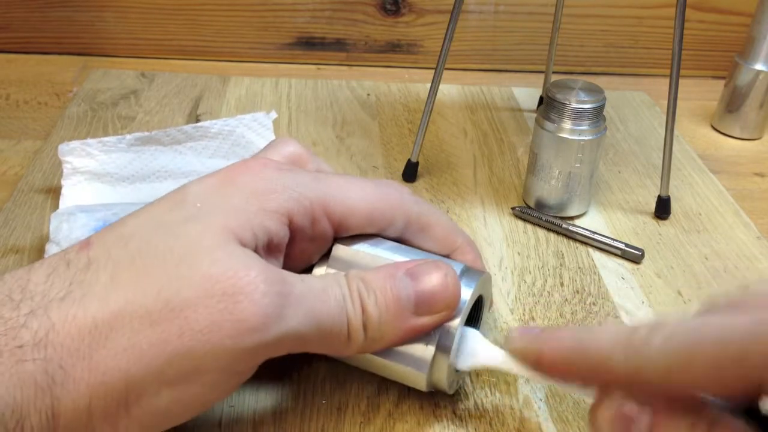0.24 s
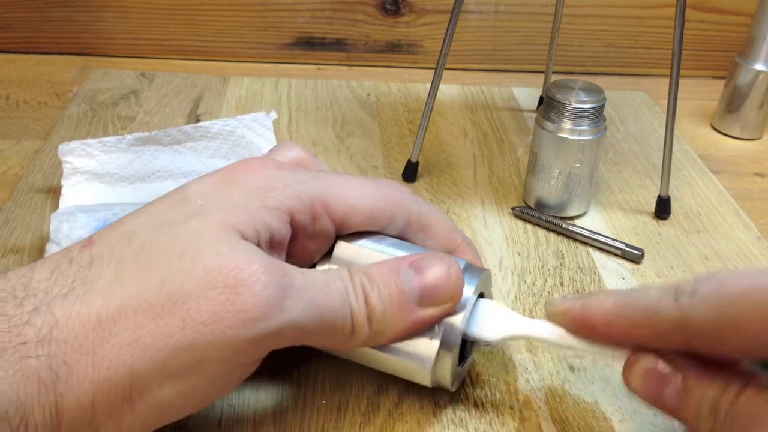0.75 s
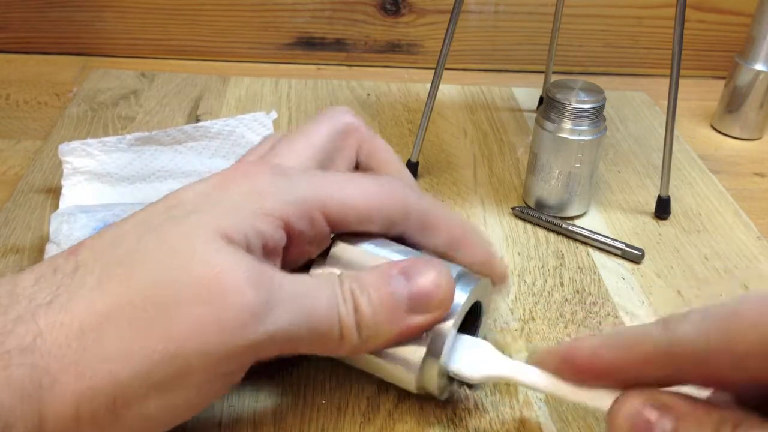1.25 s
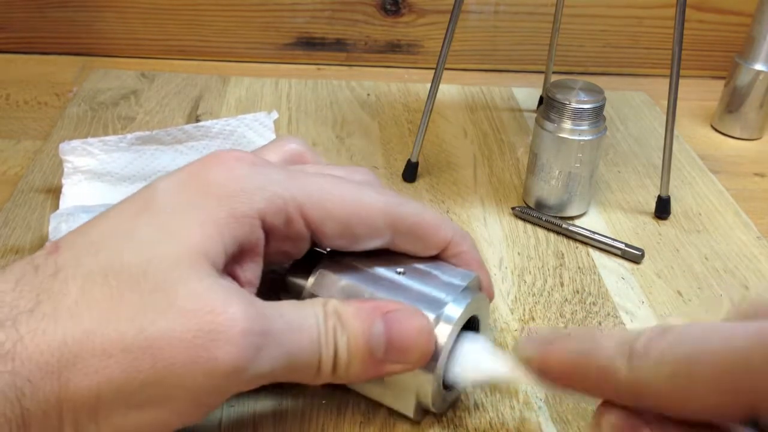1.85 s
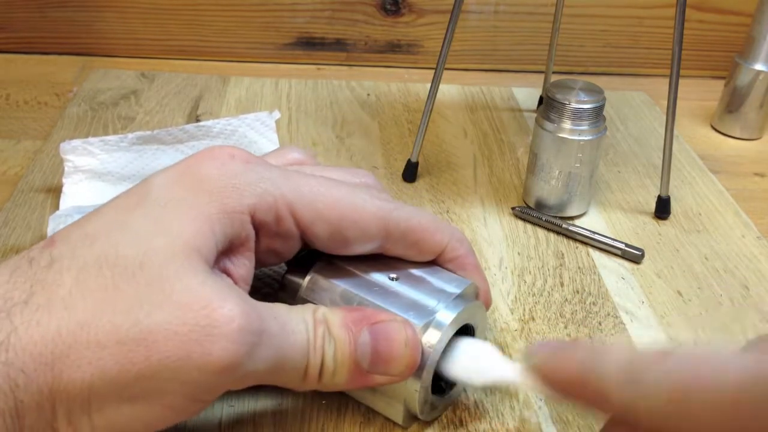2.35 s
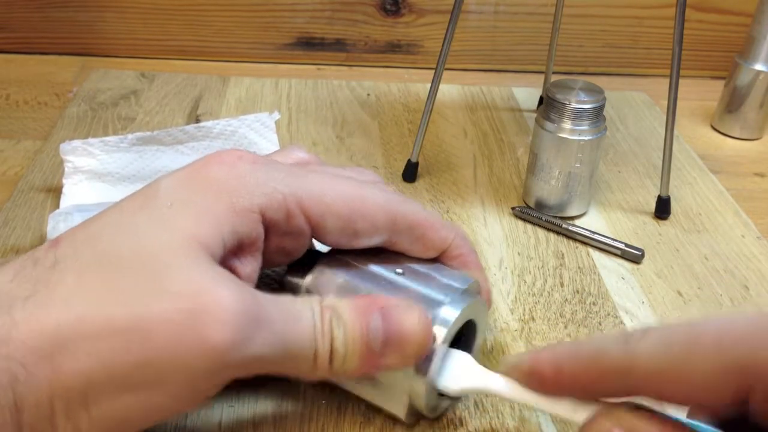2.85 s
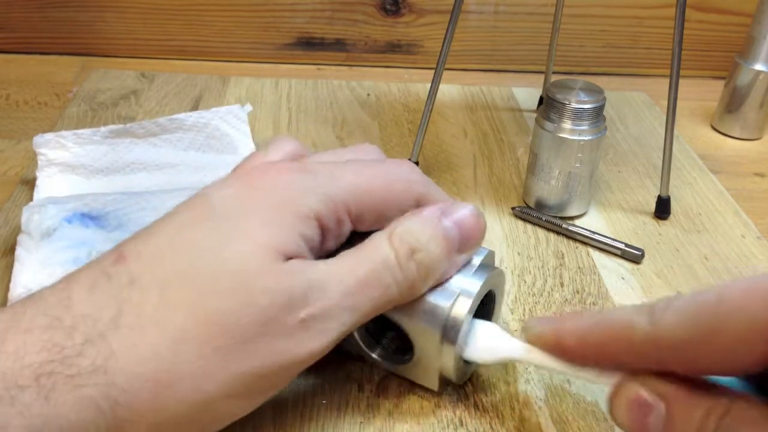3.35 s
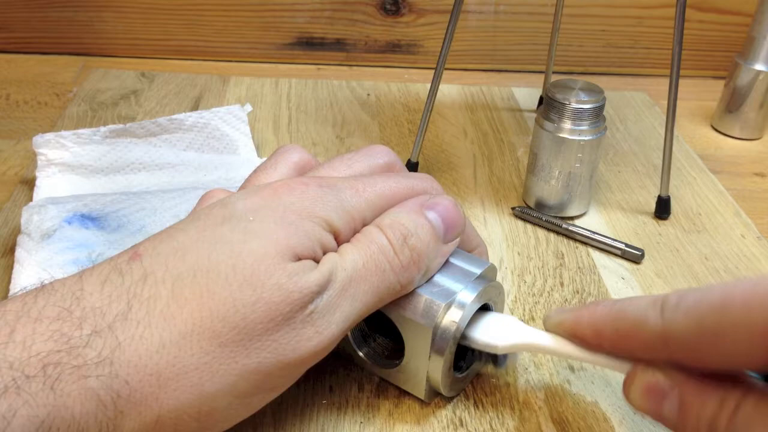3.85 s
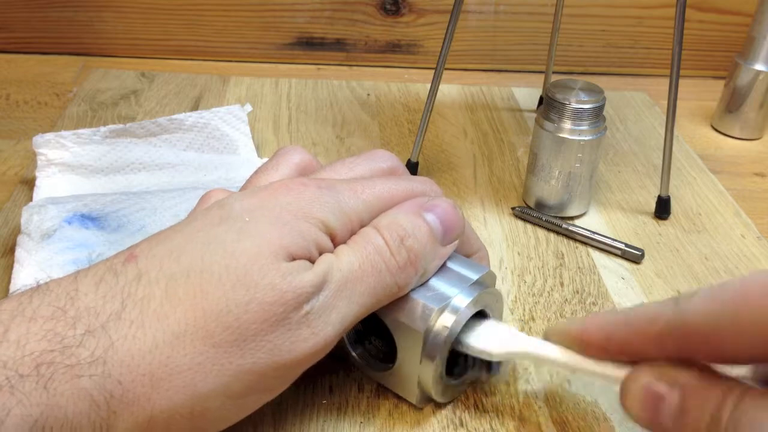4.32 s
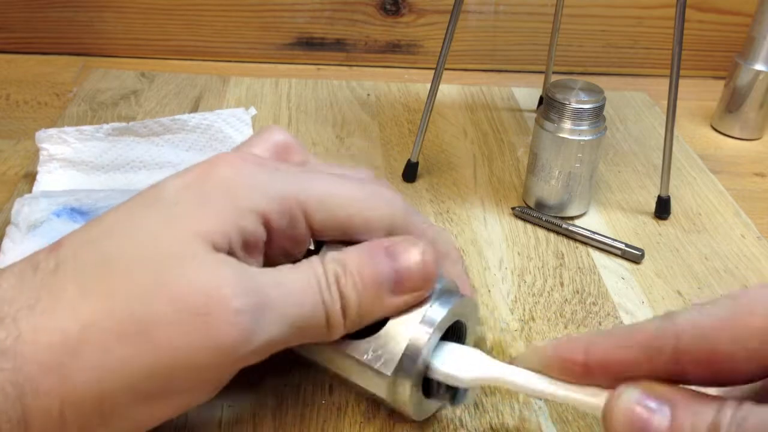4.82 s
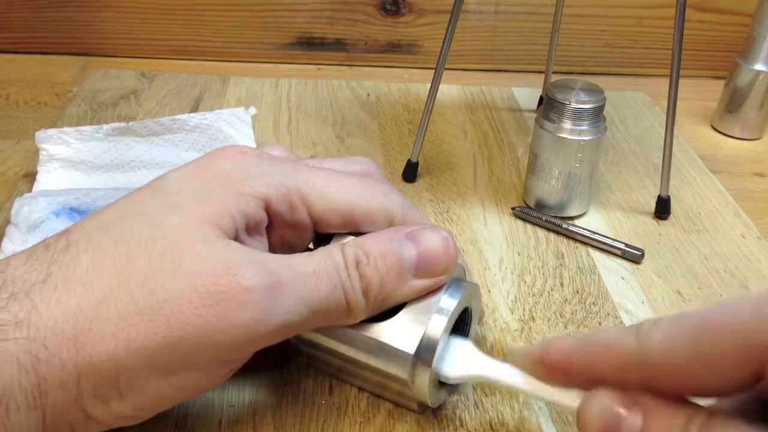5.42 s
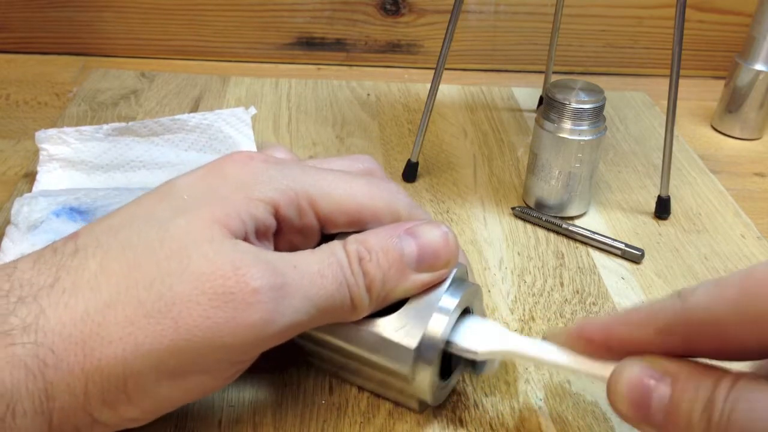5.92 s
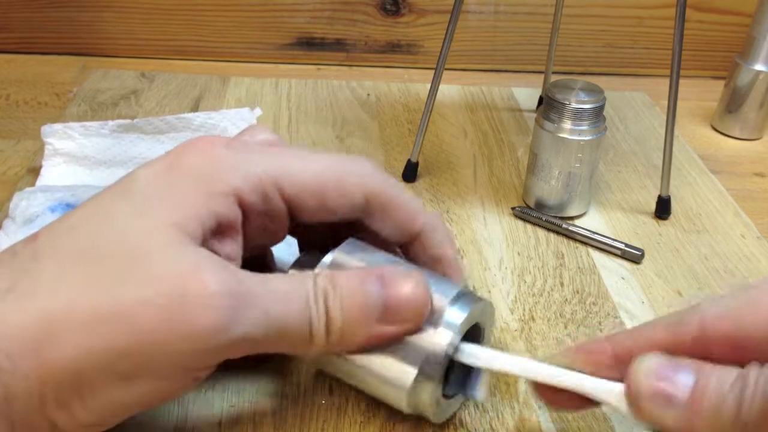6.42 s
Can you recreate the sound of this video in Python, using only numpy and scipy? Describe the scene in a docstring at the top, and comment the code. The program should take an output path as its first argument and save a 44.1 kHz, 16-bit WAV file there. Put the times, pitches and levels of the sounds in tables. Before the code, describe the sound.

Close microphone in a small, quiet room: a wet toothbrush scrubs the threads inside a hollow metal part in fast, uneven strokes, fizzy and hollow, with bright bristle snaps and little taps. Turning the part scrapes the wood and lands a hard clack near the start; softer knocks come midway, and another hard double clack late, after which brushing nearly stops.

```python
"""A small room, close microphone: a hollow metal part is held on a wooden workbench and brushed wet.
Toothbrush bristles flick over its inside threads as random tiny impacts that sound the bore; tufts snap free
as bright sprays of noise, and the brush head taps the bore. Turning the part stutters over the wood grain;
it knocks on the bench, twice tipping down hard, as noise bursts with a damped ring. Soft shoves sound dull.
The room answers with decaying noise, over faint air."""
import sys
import numpy as np
from scipy import signal
from scipy.fft import rfft, irfft, next_fast_len
from scipy.io import wavfile
from scipy.ndimage import uniform_filter1d, map_coordinates

SR = 44100
rng = np.random.default_rng(int(sys.argv[2]) if len(sys.argv) > 2 else 0)


def to_wav(s):
    """Save 16-bit WAV."""
    ch = np.atleast_2d(s).T  # columns
    pcm = np.round(np.clip(ch, -1, 1) * 32767)  # PCM
    wavfile.write(sys.argv[1], SR, pcm.astype(np.int16))


N = 294147  # length [samples]


def amp(db):
    """Decibels to gain."""
    return 10 ** (np.asarray(db) / 20)


def unit(x):
    """Scale to rms 1."""
    return x / np.sqrt(np.mean(x ** 2) + 1e-20)


def seconds(length):
    """Time axis [s] for a sound of the given number of samples."""
    return np.arange(length) / SR


def along(points, hz):
    """Read (frequency, value) points on a log frequency axis."""
    f, value = np.transpose(points)
    return np.interp(np.log(hz + 1), np.log(f + 1), value)


def wobble(rate):
    """A smooth random curve, rate knots a second."""
    knots = rng.standard_normal(int(N * rate / SR) + 4)
    return map_coordinates(knots, [np.arange(N) * rate / SR])


def filtered(x, response):
    """Multiply the spectrum of x by a response of frequency [Hz]."""
    size = next_fast_len(len(x) + SR // 4)
    hz = np.fft.rfftfreq(size, 1 / SR)
    return irfft(rfft(x, size) * response(hz), size)[:len(x)]


def coloured(x, spectrum, size=4096):
    """Causal (minimum-phase) filter of unit energy with the given spectrum."""
    gain = amp(along(spectrum, np.fft.rfftfreq(size, 1 / SR)))
    cepstrum = irfft(np.log(gain + 1e-6))
    # folding the cepstrum onto positive times makes the filter causal
    cepstrum[1:size // 2] *= 2
    cepstrum[size // 2 + 1:] = 0
    kernel = irfft(np.exp(rfft(cepstrum)))
    return signal.fftconvolve(x, kernel / np.linalg.norm(kernel))[:len(x)]


def grains(rate, spread_db):
    """Random tiny impacts of uneven size, about rate a second, rms 1."""
    size = amp(spread_db * np.clip(rng.standard_normal(N), -2, 2))
    hits = rng.random(N) < rate / SR
    return unit(hits * size * np.sign(rng.standard_normal(N)))


def burst(t, t60):
    """Noise that dies away by 60 dB in t60 [s], with the same energy at every blow."""
    fade = amp(-60 * t / t60)
    noise = fade * rng.standard_normal(len(t))
    return noise * np.linalg.norm(fade) / np.linalg.norm(noise)


def add(track, s, sound):
    """Mix a sound into the track at time s [s]."""
    start = max(round(s * SR), 0)
    track[start:start + len(sound)] += sound[:N - start]


RISE_SHARE = 0.39  # part of a movement spent speeding up
END_DROP_DB, ROUNDNESS = 22, 1.48  # fall from the peak to either end [dB]; power of that fall


def swells(times, lengths, levels_db):
    """Gain of hand movements: each speeds up, peaks and slows down, and its friction noise follows."""
    t, power = seconds(N), np.zeros(N)
    for s, length, db in zip(times, lengths, levels_db):
        near = slice(*np.searchsorted(t, [s - 2 * length, s + 2 * length]))
        phase = (t[near] - s) / length
        away = np.maximum(-phase / RISE_SHARE, phase / (1 - RISE_SHARE))
        power[near] += amp(db - END_DROP_DB * away ** ROUNDNESS) ** 2
    return np.sqrt(power)


def shifting(x, depth_db):
    """The colour drifts as the brush head opens and closes the mouth of the bore."""
    z = signal.stft(x, nperseg=512)[2]
    field = uniform_filter1d(rng.standard_normal(z.shape), size=6, axis=0)  # smooth over frequency
    field = uniform_filter1d(field, size=14, axis=1)  # smooth over time
    return signal.istft(z * amp(depth_db * unit(field)), nperseg=512)[1][:N]


# colour of the faint room air: (frequency [Hz], relative level per Hz [dB])
AIR_SPECTRUM = [(15, -76.5), (25, -44), (82, -40), (189, 3), (342, -3), (557, -18.5), (881, 6), (1040, -13),
                (1360, -17), (2810, -24.5), (7420, -8.5), (14600, -22.5), (15800, -32.5)]


def room_air():
    """Steady noise of the air in the room."""
    return amp(-79.5) * coloured(rng.standard_normal(N), AIR_SPECTRUM)


# broad resonances of the hollow part: (frequency [Hz], width [Hz], relative level [dB])
BORE_MODES = [(890.7, 45, 3.5), (1167, 130, -3), (1396, 170, -0.5), (1760, 170, 0.5), (1911, 320, -5),
              (2254, 110, -2.5), (3130, 630, -16.5)]


def bore(x, spread_db):
    """The hollow part resonates; the mode strengths depend on where the brush touches."""
    touch = spread_db * rng.standard_normal(len(BORE_MODES))

    def response(f):
        total = 0
        for k, (centre, width, db) in enumerate(BORE_MODES):
            damping = 1j * f * width
            resonance = damping / (centre * centre - f * f + damping)
            total = total + (-1) ** k * amp(db + touch[k]) * resonance  # signs alternate
        return total

    return filtered(x, response)


# pushes, pulls and twists of the brush in the threads:
# (time of fastest point [s], hiss length [s], relative hiss level [dB], relative bore level [dB])
STROKES = [(0.031, 0.27, -55, -55.5), (0.096, 0.055, -52, -56.5), (0.185, 0.172, -52, -52.5),
           (0.326, 0.15, -40.5, -46.5), (0.402, 0.06, -49.5, -58), (0.474, 0.12, -41.5, -40.5),
           (0.57, 0.061, -48, -66), (0.6, 0.16, -56.5, -53), (0.737, 0.087, -48, -52),
           (0.784, 0.09, -62.5, -62.5), (0.899, 0.11, -53.5, -45), (0.976, 0.067, -43.5, -44.5),
           (1.028, 0.14, -51.5, -55), (1.124, 0.1, -50.5, -45.5), (1.2, 0.082, -45.5, -55),
           (1.285, 0.124, -46, -49), (1.37, 0.19, -59, -67.5), (1.49, 0.16, -68, -57.5),
           (1.787, 0.085, -42, -43.5), (1.861, 0.139, -57.5, -59.5), (1.946, 0.2, -46.0, -54),
           (2.073, 0.074, -46.5, -51.5), (2.126, 0.24, -64, -59), (2.235, 0.137, -40.5, -47.5),
           (2.347, 0.108, -44.0, -51), (2.395, 0.2, -54, -57), (2.483, 0.1, -46.5, -38.5),
           (2.546, 0.25, -48.5, -52.5), (2.698, 0.211, -47, -49.5), (2.815, 0.076, -46.5, -46.5),
           (2.917, 0.193, -52, -56.5), (3.433, 0.14, -46, -48), (3.485, 0.052, -70, -68.5),
           (3.607, 0.22, -56, -54.0), (3.697, 0.08, -52, -59), (3.784, 0.05, -45, -56),
           (3.831, 0.1, -61.5, -55.5), (3.908, 0.16, -61.0, -51.5), (3.982, 0.17, -54, -63),
           (4.165, 0.13, -41.5, -48), (4.242, 0.085, -60, -48), (4.337, 0.108, -54, -50.5),
           (4.42, 0.17, -51, -55.0), (4.533, 0.201, -56.5, -58.5), (4.633, 0.063, -48, -59.5),
           (4.667, 0.14, -50, -65), (4.765, 0.096, -57, -56.5), (4.866, 0.093, -51, -57),
           (4.935, 0.195, -47.0, -57), (5.139, 0.146, -44.5, -50.5), (5.245, 0.082, -50.0, -56.5),
           (5.329, 0.28, -57, -62.5), (5.457, 0.14, -52.5, -66.5), (5.51, 0.12, -72, -61),
           (5.561, 0.1, -60.5, -65), (5.618, 0.071, -47, -49.5), (5.68, 0.156, -59, -50.5),
           (5.73, 0.11, -59.5, -66), (5.817, 0.15, -47.5, -58.5), (5.965, 0.067, -49, -57),
           (6.068, 0.24, -52, -52.5), (6.605, 0.16, -73.5, -67), (6.667, 0.076, -60, -69.5)]
# colour of wet bristles, also in snaps and taps: (frequency [Hz], relative level per Hz [dB])
BRISTLE_SPECTRUM = [(500, -38), (1500, -9), (2800, -10), (4200, -5), (5600, -6), (6500, -0.5), (7300, 2.5),
                    (8000, 1.5), (8900, 3), (10200, -3), (11500, -1.5), (13000, -1.5), (14800, -1),
                    (15800, -14.5)]
# dull colour of the bench shaken by hand or brush: (frequency [Hz], relative level per Hz [dB])
HANDLING_SPECTRUM = [(40, -39.5), (90, -34), (150, -3), (220, -3), (300, 0), (345, 5), (430, -13.5),
                     (560, -13.5), (700, -10.5), (900, -27), (1400, -37.5)]
BORE_LAG_S = 0.0033  # the bore sounds just after the bristle tips catch
REST_DB = -78  # bristles creeping in the threads between strokes, on the scale of the hiss levels


def scrubbing():
    """Bristles flick over the thread crests, sound the bore and shake the bench through the part."""
    s, length, hiss_db, bore_db = np.transpose(STROKES)
    hiss = np.hypot(swells(s, length, hiss_db), amp(REST_DB))
    hollow = swells(s + BORE_LAG_S, 0.86 * length, bore_db)
    catch = amp(1.9 * wobble(80))  # tufts catch and let go together
    flicks = coloured(grains(rate=5500, spread_db=6.0), BRISTLE_SPECTRUM)
    fizz = unit(shifting(flicks, depth_db=3.0))
    rub = unit(shifting(bore(grains(rate=2800, spread_db=1.5), spread_db=1.0), depth_db=2.5))
    rumble = unit(coloured(grains(rate=720, spread_db=3), HANDLING_SPECTRUM)) * amp(3.6 * wobble(20))
    push = unit(hollow ** 0.63)  # the load on the bench grows with the force of the stroke
    brushing = catch * (amp(0.18) * hiss * fizz + amp(-1.67) * hollow * rub)
    return brushing + amp(-62.5) * push * rumble


# decay of the small room: (frequency [Hz], time to fall 60 dB [s])
ROOM_DECAY = [(150, 0.27), (400, .36), (1000, 0.28), (2500, 0.28), (5000, 0.18), (12000, 0.046)]


def room(x):
    """Bench top and near walls answer within milliseconds; the treble dies first."""
    hz, t, z = signal.stft(rng.standard_normal(SR // 2), SR, nperseg=256)
    decay = amp(-60 * t / along(ROOM_DECAY, hz)[:, None])
    tail = signal.istft(z * decay, SR, nperseg=256)[1]
    tail *= 1 - np.exp(-seconds(len(tail)) / 0.0012)  # the answer builds up
    return signal.fftconvolve(x, tail / np.linalg.norm(tail))[:N]


# the hands press the part against the bench: (time [s], relative level [dB])
BUMPS = [(0.099, -49.5), (0.59, -53), (1.484, -47), (2.776, -50.5), (3.464, -49), (3.59, -45),
         (3.712, -49.5), (4.241, -53), (5.663, -51.5), (5.824, -55)]


def bumps():
    """Soft, dull shoves into the bench top: low noise with a gradual onset."""
    out, t = np.zeros(N), seconds(SR // 4)
    for s, db in BUMPS:
        shove = burst(t, t60=0.24) * (1 - np.exp(-t / 0.0081))
        add(out, s, amp(db + 2.0) * coloured(shove, HANDLING_SPECTRUM))
    return out


# wet bristle tufts snap free: (time [s], relative level [dB])
SNAPS = [(0.2713, -36), (0.3444, -26.5), (0.4946, -19.5), (0.545, -31.5), (0.7275, -31), (0.9649, -34),
         (1.1868, -24), (1.3078, -25), (1.3296, -20), (2.2539, -25.5), (2.3384, -28), (2.5137, -23),
         (2.5741, -21.5), (2.8066, -23.5), (3.4281, -14.5), (3.4347, -18), (4.1572, -23.5), (5.244, -30.5),
         (5.6169, -29), (6.1384, -39.5)]
SNAP_LOW_HZ = 5540  # a snapping tuft is too small to radiate much below this


def snaps():
    """A tuft snaps off a thread: one short, bright spray."""
    out, t = np.zeros(N), seconds(SR // 16)
    for s, db in SNAPS:
        spray = burst(t, t60=0.0095) * (1 - np.exp(-t / 0.00051))
        add(out, s, amp(db - 1.5) * coloured(spray, BRISTLE_SPECTRUM))
    highpass = signal.butter(2, SNAP_LOW_HZ, "highpass", fs=SR, output="sos")
    return signal.sosfilt(highpass, out)


# the brush head hits the bore:
# (time [s], relative bore level [dB], relative click level [dB], relative bristle flick level [dB])
TAPS = [(0.302, -22, -34.5, -35), (0.485, -17, -33, -33.5), (0.878, -15, -37.5, -34),
        (1.114, -20, -36, -33), (1.281, -17.5, -31, -37.5), (1.9445, -32.5, -35.5, -45.5),
        (2.206, -20, -34, -34), (2.345, -27, -48.5, -39.5), (2.466, -12.5, -19.5, -29.5),
        (2.682, -19.5, -21.5, -31.5), (2.908, -25.5, -27, -33.5), (3.347, -25.5, -20, -40.5),
        (3.8054, -25.5, -62, -64), (4.163, -27, -36, -37.5), (4.339, -20.5, -31, -44),
        (5.128, -18.5, -28.5, -36.5), (5.671, -35, -55, -63), (5.841, -31.5, -69, -59),
        (6.081, -18.5, -30.5, -54)]
# colour of the plastic head on metal: (frequency [Hz], relative level per Hz [dB])
CLICK_SPECTRUM = [(60, -39), (150, -3.5), (290, -0.5), (550, -7), (1500, -8), (2500, 2), (3400, 6.5),
                  (4400, 5.5), (6000, 3.5), (9000, -11), (15000, -22.5)]
TAP_SHAKE_DB = -34  # shake of the bench under a tap, added to the listed bore level


def taps():
    """The plastic head grazes the metal, clicks, the bore answers, the bench shakes; the bristles spring past."""
    out, t = np.zeros(N), seconds(SR // 8)
    lead = 0.03  # the graze and flick swell for this long before the hit [s]
    flick = np.where(t < lead, np.exp((t - lead) / 0.0063), np.exp((lead - t) / 0.0017))
    for s, db, click_db, flick_db in TAPS:
        blow = signal.unit_impulse(len(t))
        chatter = burst(t, t60=0.028)
        ring = bore(blow + 0.11 * chatter, spread_db=0.5)
        graze = unit(bore(rng.standard_normal(len(t)), spread_db=5.0))
        spray = coloured(rng.standard_normal(len(t)), BRISTLE_SPECTRUM)
        shake = coloured(burst(t, t60=0.16), HANDLING_SPECTRUM)
        click = coloured(6 * blow + burst(t, t60=0.012), CLICK_SPECTRUM)
        add(out, s, amp(db - 1.0) * ring / np.abs(ring).max())
        add(out, s, amp(db + TAP_SHAKE_DB) * shake)
        add(out, s, amp(click_db - 0.5) * click)
        add(out, s - lead, flick * (amp(flick_db + 3.0) * spray + amp(db - 20.5) * graze))
    return out


# the part is dragged over the wood as it is turned:
# (time of fastest point [s], length [s], relative grating level [dB], relative edge level [dB])
DRAGS = [(1.603, 0.12, -34, -41.5), (2.933, 0.093, -30, -37), (4.747, .14, -27.5, -35),
         (4.814, 0.071, -35, -68), (4.933, .14, -40.5, -69), (6.163, 0.023, -39, -26),
         (6.387, 0.12, -38.5, -50.5)]
# colour of metal grating on wood grain: (frequency [Hz], relative level per Hz [dB])
GRATING_SPECTRUM = [(60, -37.5), (130, -23), (255, -4.5), (360, -8.5), (470, -5.5), (600, 0.5),
                    (730, -11.5), (870, 5), (1050, -12), (1330, -6), (1800, -13.5), (2230, -10.5),
                    (2800, -26.5), (7000, -51)]
# colour of a metal edge on wood, also in knocks: (frequency [Hz], relative level per Hz [dB])
EDGE_SPECTRUM = [(300, -46.5), (1200, -27.5), (2000, -3.5), (2600, 4.5), (3400, 6.5), (3900, 1.5),
                 (4500, -4.5), (6000, -13.5), (9000, -26), (15000, -46.5)]


def drags():
    """The turned part stutters over the wood grain in tiny slips."""
    s, length, grating_db, edge_db = np.transpose(DRAGS)
    grating, edge = swells(s, length, grating_db), swells(s, length, edge_db)
    slips = grains(rate=1800, spread_db=4) * amp(2.2 * wobble(150))
    flat_scrape = grating * unit(coloured(slips, GRATING_SPECTRUM))
    edge_scrape = edge * unit(coloured(slips, EDGE_SPECTRUM))
    return amp(-1.4) * flat_scrape + amp(-4.5) * edge_scrape


# the part drops or rebounds on the bench: (time [s], relative clack level [dB],
# relative thud level [dB], relative edge level [dB], lowpass corner of the contact [Hz])
KNOCKS = [(1.632, -1.5, -23.5, -13, 9960), (2.921, -22, -51, -43, 1764), (4.801, -14.5, -30, -45, 1570),
          (6.169, -2, -16.5, -1.5, 10200), (6.186, -16, -34.5, -20, 10040), (6.388, -21, -26.5, -48, 880)]
# colour of the clack on the bench: (frequency [Hz], relative level per Hz [dB])
BENCH_SPECTRUM = [(40, -41.5), (200, -7.5), (330, -6), (550, -9.5), (930, -1), (1400, -6), (1770, 1.5),
                  (2250, 1.5), (2700, -10.5), (3350, -2.5), (4300, -16), (7300, -34), (8300, -31.5),
                  (15000, -60)]
# colour of the bench's thud: (frequency [Hz], relative level per Hz [dB])
THUD_SPECTRUM = [(25, -37), (90, -26), (160, -14), (240, 0.5), (345, 18), (480, 0), (900, -52.5)]
# part and bench ringing together: (frequency [Hz], relative level [dB], time to fall 60 dB [s])
RING_MODES = [(236, -3.5, .19), (268, -4, .22), (352, -1.5, .2), (737, -3.5, .14), (900, -7, 0.2),
              (971, -3.5, 0.34), (1236, -5, .22), (1490, -5, .14), (1890, -2.5, .22), (2055, 0.5, .22),
              (2207, -1.5, .14), (2365, -2.5, 0.19), (2738, -6, .22), (3143, -5, 0.12), (3350, -2, 0.26),
              (3660, -9, .36), (8200, -20, .2)]


def knocks():
    """The part falls on a flat and chatters to rest: hard clack, bench thud and a ring damped by the hand."""
    out, t = np.zeros(N), seconds(SR // 2)
    for s, db, thud_db, edge_db, contact_hz in KNOCKS:
        strengths = amp(1.5 * rng.standard_normal(len(RING_MODES)))
        ring = np.zeros(len(t))
        for strength, (hz, level, t60) in zip(strengths, RING_MODES):
            tone = np.sin(2 * np.pi * (hz * t + rng.random()))
            ring += strength * amp(level - 60 * t / t60) * tone
        contacts = grains(rate=2200, spread_db=3)[:len(t)]
        chatter = contacts * amp(-60 * t / 0.16)
        strike = burst(t, t60=0.028) + amp(-17.5) * chatter
        clack = coloured(strike, BENCH_SPECTRUM) + amp(-25.5) * ring
        # a cushioned fall has a longer contact and so a duller clack
        clack = signal.sosfilt(signal.butter(2, contact_hz, fs=SR, output="sos"), clack)
        thud = coloured(burst(t, t60=0.098), THUD_SPECTRUM)
        edge = coloured(burst(t, t60=0.018) + amp(-16.5) * burst(t, t60=0.26), EDGE_SPECTRUM)
        add(out, s, amp(db - 3.5) * clack + amp(thud_db - 3.0) * thud + amp(edge_db - 8) * edge)
    return out


# light passes along the wall of the bore: (time of fastest point [s], length [s], relative level [dB])
SLIDES = [(3.108, 0.17, -53), (3.22, 0.096, -49.5), (3.326, 0.16, -48)]
# colour of the light swish: (frequency [Hz], relative level per Hz [dB])
SWISH_SPECTRUM = [(100, -17), (300, 9.5), (600, -8), (900, -3), (1250, -6), (1700, 7), (2100, -7),
                  (2800, -10), (4000, 8), (4900, 8.5), (5900, -2), (7200, 5), (8400, -11), (10000, -1.5),
                  (15000, -15.5)]


def sliding():
    """With little pressure the bristles only swish, without catching."""
    swish = coloured(rng.standard_normal(N), SWISH_SPECTRUM)
    return amp(-1.5) * swells(*np.transpose(SLIDES)) * unit(shifting(swish, depth_db=2.5))


def scene():
    """Brush and part on the workbench with the room's answer, over faint room air."""
    work = scrubbing() + bumps() + snaps() + taps() + drags() + knocks() + sliding()
    return (work + amp(-14.5) * room(work) + room_air())[None]


TOP_HZ = 15750  # band limit of the microphone


def record(dry):
    """The close microphone thins deep bass, rounds off the highest peaks and stops at its band limit."""
    thin = signal.sosfilt(signal.butter(2, 95, "highpass", fs=SR, output="sos"), dry[0])
    held = thin / (1 + np.abs(thin / 0.95) ** 6) ** (1 / 6)  # soft ceiling at 0.95
    return filtered(held, lambda hz: hz < TOP_HZ)[None]


dry = scene()
out = record(dry)
to_wav(out)
```